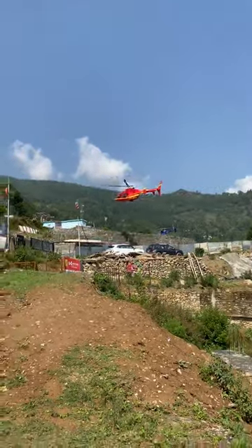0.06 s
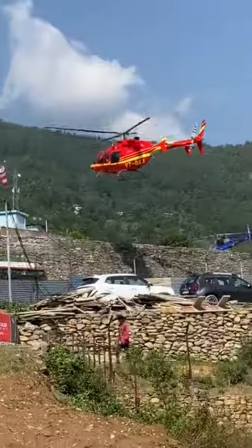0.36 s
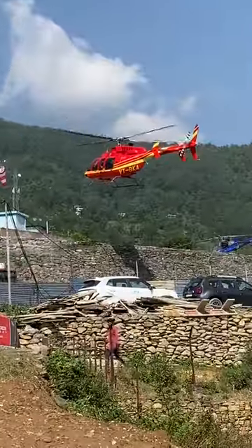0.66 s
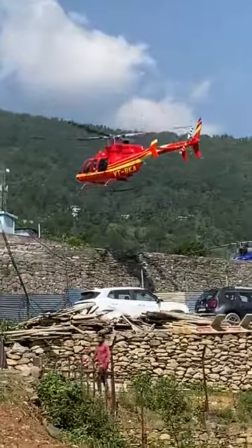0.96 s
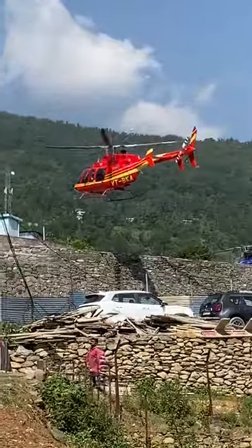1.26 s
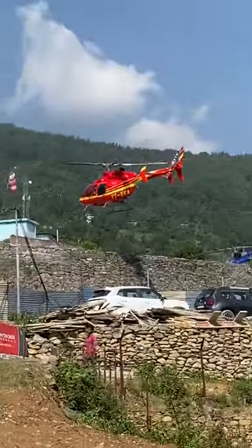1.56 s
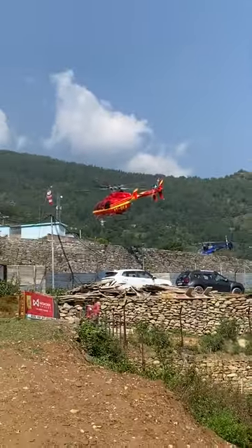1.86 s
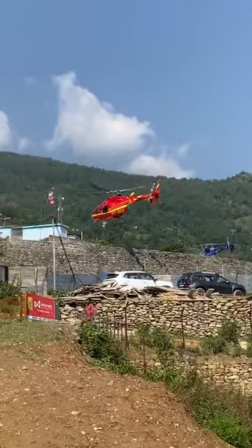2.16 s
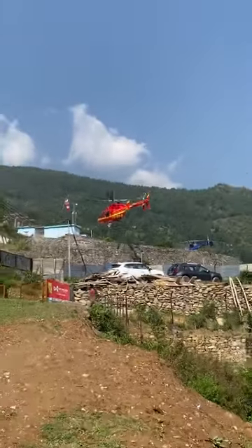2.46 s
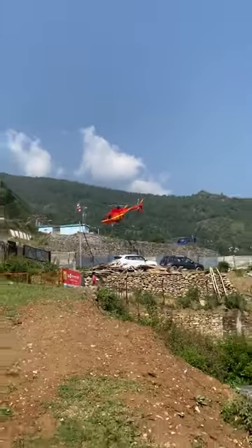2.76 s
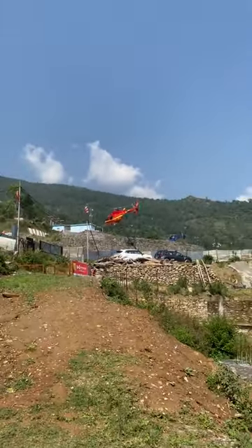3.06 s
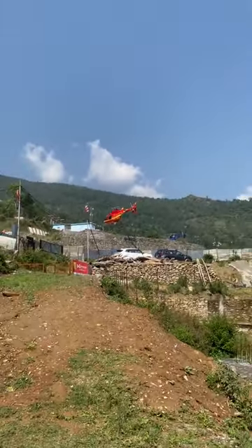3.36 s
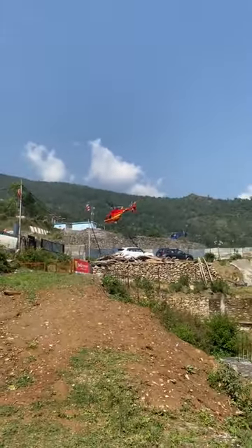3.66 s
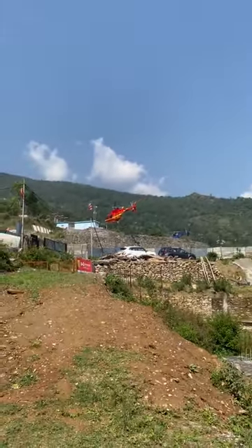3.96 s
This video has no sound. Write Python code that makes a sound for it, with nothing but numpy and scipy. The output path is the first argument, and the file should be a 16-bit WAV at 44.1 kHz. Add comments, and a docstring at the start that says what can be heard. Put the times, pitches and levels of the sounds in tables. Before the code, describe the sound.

A helicopter flies low over an open hillside, its blades thumping and swishing rapidly over a roar, a low drone and faint turbine hiss. The blades slap harder midway, then the sound eases slightly as it moves off.

```python
"""The main rotor of a light helicopter thumps, swishes and slaps, low over a hillside, then moves off.
Each blade radiates a pressure pulse and a burst of turbulent noise, and slaps when it cuts the tip
vortex of the blade ahead. Behind it the tail rotor drones in harmonics, downwash and exhaust roar,
and the turbine gives a very high whine amid hiss. The ground returns dull reflections."""
import sys
import numpy as np
from scipy import signal
from scipy.fft import rfft, irfft, next_fast_len
from scipy.io import wavfile

SR = 44100
rng = np.random.default_rng(int(sys.argv[2]) if len(sys.argv) > 2 else 0)


def transcribe(signal):
    """Save signal, clipped to [-1, 1], as a 16-bit WAV file at the path in sys.argv[1]."""
    frames = np.atleast_2d(signal).T
    limited = np.clip(frames, -1, 1)
    pcm = np.round(limited * 32767).astype(np.int16)
    wavfile.write(sys.argv[1], SR, pcm)


N = 176400
TIME, BIN_HZ = np.arange(N) / SR, np.arange(N // 2 + 1) * SR / N


def from_db(db):
    """Amplitude ratio: tenfold for every 20 dB."""
    return 10 ** (np.asarray(db) / 20)


def unit_rms(x):
    """Normalisation to unit mean power."""
    return x / np.sqrt(np.mean(x ** 2) + 1e-20)


def in_time(rows, column=1):
    """Linear interpolation of one column at every sample."""
    rows = np.array(rows)
    return np.interp(TIME, rows[:, 0], rows[:, column])


def at_hz(rows, hz, column=1):
    """Interpolation of one column on a logarithmic frequency axis."""
    rows = np.array(rows)
    return np.interp(np.log(np.maximum(hz, 1)), np.log(rows[:, 0]), rows[:, column])


def drift(corner_hz):
    """Slow random fluctuation: low-passed Gaussian noise of unit rms."""
    step, settle = 40, 2000
    pole = np.exp(-2 * np.pi * corner_hz * step / SR)
    white = rng.standard_normal(N // step + settle + 2)
    slow = signal.lfilter([1], [1, -2 * pole, pole * pole], white)[settle:]
    return np.interp(np.arange(N) / step, np.arange(len(slow)), unit_rms(slow))


# Limits of the bands that fluctuate independently: (frequency [Hz])
BAND_LIMITS = [0, 320, 560, 900, 1300, 1800, 2600, 3800, 6000, 23000]
def bands(x):
    """Superposition: adjacent frequency bands whose sum is the whole sound."""
    spectrum = rfft(x)
    return [irfft(spectrum * ((BIN_HZ >= low) & (BIN_HZ < high)), N)
            for low, high in zip(BAND_LIMITS, BAND_LIMITS[1:])]


# Two microphones: (frequency [Hz], coherence [ratio], left minus right [dB], left phase lead [rad])
MIC_PAIR = [(102, .999, 0, 0), (292, .99, -1.3, 0.17), (510, 0.77, 3.3, .5), (765, 0.94, 2.5, 0.5),
            (1065, 0.41, 6.5, 0.8), (1260, .95, 7.5, -1.2), (1470, .8, 2, 0.7), (2000, 0.8, 1.3, 0.5),
            (3020, 0.65, 0.5, 0.9), (3620, 0.8, 1, 0.4), (5070, 0.6, .3, 0.9), (6710, .85, 0, 2.2),
            (13350, 0.9, 0, 9), (15900, .8, 0, 12)]
def partly_coherent(pair):
    """Partial coherence: two independent noises mix as mid and side, at unit rms."""
    coherence = np.clip(at_hz(MIC_PAIR, BIN_HZ), 0, .9995)
    mid, side = rfft(pair)
    left_right = np.sqrt(1 + coherence) * mid + np.sqrt(1 - coherence) * side * np.array([[1], [-1]])
    return unit_rms(irfft(left_right, N))


def air_noise(spectrum):
    """Spectral shaping: white noise takes on a given colour, in stereo at unit rms."""
    white = rfft(rng.standard_normal((2, N)))
    return partly_coherent(irfft(white * from_db(at_hz(spectrum, BIN_HZ)), N))


# Turbine: (time [s], relative hiss level [dB], relative whine level [dB], whine frequency [Hz])
TURBINE_COURSE = [(0.0, -43, -43, 14800), (0.58, -44, -45, 14800), (0.91, -43, -41.5, 15000),
                  (1.29, -46.5, -48, 15000), (2.4, -47, -45, 15300), (2.58, -45, -40, 15200),
                  (3.85, -48.5, -52, 15200), (4.0, -47.5, -42, 15200)]
# High hiss with notches near 7 and 13.8 kHz, which the engine does not make:
# (frequency [Hz], relative density [dB])
NOTCHED_HISS_SPECTRUM = [(2000, -15), (3600, 8), (4500, 5), (5500, -1.5), (7000, -15), (8400, 6),
                         (10400, 3.5), (12000, 3), (13800, -26), (16000, -11)]
# A lower band of hiss: (frequency [Hz], relative density [dB])
LOW_HISS_SPECTRUM = [(3000, -33), (3950, -2), (4250, -6), (4600, 3), (5100, -12), (6000, -19)]
# The lower band comes forward as the helicopter turns away: (time [s], level [dB])
LOW_HISS_LEVEL = [(0, -62), (3.2, -48.5), (3.5, -52), (3.7, -39.5), (3.9, -50.5)]
def turbine():
    """Spectral broadening: turbulence smears the compressor tone into a narrow band amid high hiss."""
    carrier = np.exp(2j * np.pi * np.cumsum(in_time(TURBINE_COURSE, column=3)) / SR)
    whine = 0
    for half_width_hz, db in ((85, -1), (330, -1.5)):  # core, skirt
        lowpass = signal.butter(2, half_width_hz, fs=SR, output="sos")
        real, imag = signal.sosfilt(lowpass, rng.standard_normal((2, 2, N)))
        whine += from_db(db) * partly_coherent(((real + 1j * imag) * carrier).real)
    hiss = air_noise(NOTCHED_HISS_SPECTRUM) * from_db(2 + in_time(TURBINE_COURSE) + .5 * drift(9.3))
    hiss += air_noise(LOW_HISS_SPECTRUM) * from_db(in_time(LOW_HISS_LEVEL))
    return whine * from_db(in_time(TURBINE_COURSE, column=2) + 2.1 * drift(25)) + hiss


# Rushing air: (time [s], relative midrange level [dB], relative treble level [dB])
AIR_LEVELS = [(0, -22, -24), (.23, -26.5, -24.5), (.5, -25.5, -24.5), (.8, -23.5, -25.5), (.96, -29, -23.5),
              (1.07, -25.5, -26.5), (1.3, -29.5, -30), (1.52, -27.5, -29.5), (1.66, -23, -29),
              (1.8, -24.5, -32.5), (2.12, -25, -28), (2.45, -24, -28.5), (2.65, -21.5, -26.5),
              (2.85, -24, -29), (3.1, -24.5, -33), (3.35, -27.5, -33), (3.74, -28.5, -31), (4, -24.5, -33)]
# Spectra of the low and high roar: (frequency [Hz], relative density [dB])
LOW_ROAR_SPECTRUM = [(30, -20), (70, -11.5), (120, -9.5), (200, -1.5), (290, -5.5), (480, -6), (700, -4),
                     (1000, -12.5), (1600, -29.5), (3000, -45.5)]
HIGH_ROAR_SPECTRUM = [(400, -58), (850, -2.5), (1400, -1), (2100, -7), (3200, -10.5), (4500, -19),
                      (6300, -18), (9000, -61)]
def roar():
    """Broadband flow noise of downwash and exhaust; each band fades on its own in the moving air."""
    low = air_noise(LOW_ROAR_SPECTRUM) * from_db(in_time(AIR_LEVELS) - 1)
    high = air_noise(HIGH_ROAR_SPECTRUM) * from_db(in_time(AIR_LEVELS, column=2) - 2.5 + 1.63 * drift(64))
    return sum(band * from_db(1.5 * drift(5.7)) for band in bands(low + high))


def partial(cycles, fade_db, blur_rad):
    """Amplitude and phase modulation of a rotor harmonic by moving air, at unit rms."""
    fading = from_db(fade_db * drift(3.6))
    return unit_rms(fading * np.sin(2 * np.pi * (cycles + rng.random()) + blur_rad * drift(1.7)))


TAIL_HZ, TAIL_WANDER = 83.08, 0.00208  # blade-passage frequency, its relative spread
# The tail rotor's first three harmonics: (time [s], level [dB])
TAIL_LEVEL_1 = [(0.0, -41.5), (0.47, -22), (0.96, -34.5), (1.55, -27), (1.83, -32.5), (2.03, -54),
                (2.19, -30), (2.95, -25), (3.45, -43.5), (4.0, -35)]
TAIL_LEVEL_2 = [(0, -32), (.7, -37.5), (1.0, -33.5), (1.2, -29.5), (1.7, -33.5), (2.05, -26), (2.3, -33.5),
                (3.1, -28), (3.75, -30.5), (4, -25.5)]
TAIL_LEVEL_3 = [(0, -35), (.35, -29), (.5, -25), (.7, -24), (.85, -36.5), (1.3, -36), (1.45, -25.5),
                (1.7, -44.5), (2.1, -23), (2.25, -34.5), (2.5, -24.5), (3.15, -26), (3.4, -31), (4, -26.5)]
# Its weaker overtones: (harmonic number, level [dB])
TAIL_OVERTONES = [(4, -42.5), (7, -40.5), (8, -43.5), (9, -45), (10, -48)]
def tail_rotor():
    """Harmonic series: the small, fast rotor drones at multiples of its blade-passage frequency."""
    cycles = np.cumsum(TAIL_HZ * (1 + TAIL_WANDER * drift(1.54))) / SR
    low = sum(from_db(in_time(level)) * partial(k * cycles, fade_db=0.62, blur_rad=0.091)
              for k, level in enumerate((TAIL_LEVEL_1, TAIL_LEVEL_2, TAIL_LEVEL_3), start=1))
    upper = sum(from_db(db) * partial(k * cycles, fade_db=3.5, blur_rad=1.0) for k, db in TAIL_OVERTONES)
    return low + upper


def dulled(x, cutoff_hz=1950):
    """Reflection loss: the ground returns less treble than bass."""
    return signal.sosfilt(signal.butter(1, cutoff_hz, fs=SR, output="sos"), x)


# Paths by way of ground and terraces: (delay [s], left gain [dB], right gain [dB])
ECHO_PATHS = [(.0085, -17, -15.5), (.049, -19.5, -16.5), (.094, -5, -28)]
def hillside_echoes(x):
    """Discrete reflections: each longer path delivers a late, dull copy."""
    dull = dulled(x)
    return sum(from_db([[left], [right]]) * np.pad(dull, ((0, 0), (int(delay * SR), 0)))[:, :N]
               for delay, left, right in ECHO_PATHS)


# Ground reflection as the helicopter recedes: (time [s], reflected amplitude [ratio])
GROUND_REFLECTION = [(2.65, 0.03), (3.5, 0.19), (4, 0.12)]
def ground_effect(x, delay_ms=1.886):
    """Interference: at grazing incidence the reflection is inverted and hollows out the direct sound."""
    share = in_time(GROUND_REFLECTION)
    reflected = np.array([np.interp(TIME - delay_ms / 1000, TIME, side) for side in dulled(x)])
    return (x - share * reflected) / np.sqrt(1 + share ** 2)


BLADE_HZ = 27.3  # blade-passage frequency of the main rotor
# Line spectrum of the thump: (harmonic number, relative level [dB])
THUMP_HARMONICS = [(1, -30), (2, -2.5), (4, -6), (5, -6), (6, -2), (7, 4.5), (8, 0), (9, -4.5), (10, 2),
                   (11, -1.5), (12, -12), (14, -9.5), (15, -6)]
# Envelopes of harmonics 1-2 and of those above: (time [s], relative level [dB])
THUMP_DEEP_LEVEL = [(0.0, -33), (0.57, -35), (2.35, -26), (3.05, -36), (4.0, -32.5)]
THUMP_UPPER_LEVEL = [(0, -40.5), (.9, -37.5), (1.3, -32), (1.7, -41), (2.3, -34), (2.8, -36), (3.1, -34.5),
                     (3.4, -41), (4, -39)]
def rotor_thump():
    """Fourier synthesis: the periodic pressure pulses of the main blades, heard as low harmonics."""
    deep, upper = from_db(in_time(THUMP_DEEP_LEVEL)), from_db(in_time(THUMP_UPPER_LEVEL))
    out = np.zeros(N)
    for k, db in THUMP_HARMONICS:
        cycles = k * BLADE_HZ * TIME
        if k <= 2:
            out += from_db(db) * deep * partial(cycles, fade_db=1.0, blur_rad=0.064)
        else:
            out += from_db(db) * upper * partial(cycles, fade_db=3.5, blur_rad=0.38)
    return out


# Lateness of the loud part of each sweep as the rotor tilts: (time [s], lag [ms])
BLADE_LAG = [(0, 1), (.42, 4.5), (.7, 3), (1.0, 3.5), (1.12, -0.5), (1.48, -2.5), (1.65, 2), (1.83, 4.5),
             (1.97, -0.5), (2.2, 1.5), (2.5, 4.5), (2.75, 4), (3.05, 6), (3.5, 4.5), (3.65, -4), (4, -5)]
def blade_times():
    """Blade passage: the nearly periodic instants at which a blade sweeps toward the listener."""
    regular = np.arange(int(N / SR * BLADE_HZ) + 1) / BLADE_HZ
    return regular + np.interp(regular, TIME, in_time(BLADE_LAG)) / 1000


def sweeps(noise, rise_ms, fall_ms, delay_ms=0, scatter_ms=1.95, colour_db=1.5):
    """Amplitude modulation: noise swells with each blade, each band with its own strength and lag."""
    times, out = blade_times(), 0
    blade_db = 0.2 * rng.standard_normal(len(times))
    for band in bands(noise):
        envelope = np.zeros(N)
        deviations = np.clip(rng.standard_normal((len(times), 2)), -2, 2)
        for at, db, (colour, late) in zip(times, blade_db, deviations):
            near = slice(max(int((at - .5 / BLADE_HZ) * SR), 0), int((at + 1 / BLADE_HZ) * SR))
            ms = (TIME[near] - at) * 1000 - delay_ms - scatter_ms * late
            rise, fall = np.exp(-(ms / rise_ms) ** 2), np.exp(-np.abs(ms / fall_ms) ** 1.3)
            envelope[near] += from_db(db + colour_db * colour) * np.where(ms < 0, rise, fall)
        out += band * envelope
    return unit_rms(out)


# Spectra of the bright swish and the dark whuff: (frequency [Hz], relative density [dB])
SWISH_SPECTRUM = [(400, -22), (800, 0.5), (1400, 1), (2100, -4.5), (2800, -7), (4600, -14.5), (6500, -26.5),
                  (12000, -45)]
WHUFF_SPECTRUM = [(120, -25), (220, -4), (350, -1), (500, -4.5), (720, 2), (1000, -6.5), (1500, -10),
                  (3000, -35)]
# Their prominence over the rushing air: (time [s], relative level [dB])
SWISH_LEVEL = [(0, 1), (.28, 2), (.5, -2.5), (.75, -3.5), (.92, 0.5), (1.08, -4.5), (1.33, -0.5),
               (1.48, 8.5), (1.67, 1.5), (2.15, -0.5), (2.38, -5), (2.65, -3), (2.95, -2.5), (3.25, -6),
               (4, -7.5)]
WHUFF_LEVEL = [(0, -3.5), (.3, 5.5), (.55, -3.5), (.95, -1), (1.15, 3.5), (1.35, 6), (1.5, 3.5), (1.7, 3.5),
               (1.9, 3.5), (2.15, 4.5), (2.38, -5.5), (2.7, 0.5), (3.2, 1.5), (3.6, -7.5), (4, -3.5)]
def blade_swish():
    """Turbulent noise: air torn by each blade gives a bright swish, then a darker whuff."""
    swish = sweeps(air_noise(SWISH_SPECTRUM), rise_ms=2.94, fall_ms=5.3)
    whuff = sweeps(air_noise(WHUFF_SPECTRUM), rise_ms=3.7, fall_ms=6.8, delay_ms=1.35)
    return (swish * from_db(in_time(SWISH_LEVEL) + in_time(AIR_LEVELS, column=2) - 2)
            + whuff * from_db(in_time(WHUFF_LEVEL) + in_time(AIR_LEVELS) - 4.5))


# Glancing vortex cuts: (time [s], envelope peak [dB], frequency [Hz])
GLANCING_CUTS = [(.15, -16, 2500), (0.958, -13, 1410), (1.464, -13.5, 1860), (2.827, -13.5, 1380),
                 (2.862, -18.5, 1840), (2.899, -14.5, 1690), (2.937, -11, 1500), (3.01, -13.5, 1400),
                 (3.047, -16, 1790), (3.375, -22, 1950)]
def blade_knocks(width_ms=1.8):
    """Tone bursts: a glancing vortex cut radiates a few cycles around one pitch."""
    out = np.zeros(N)
    for at, db, hz in GLANCING_CUTS:
        since = TIME - at
        envelope = from_db(db) * np.exp(-(since * 1000 / width_ms) ** 2)
        out += envelope * np.sin(2 * np.pi * (hz * since + rng.random()))
    return out


# Square hits on the vortex: (time [s], peak level [dB])
SQUARE_CUTS = [(1.838, -11), (2.052, -9.5), (2.6063, -3), (2.6407, -7), (2.7151, -7), (2.7506, -6.5),
               (2.788, -10.5), (2.8264, -7)]
def blade_cracks():
    """Impulsive radiation: each square vortex cut makes one pressure jump, blunter when weaker."""
    out = np.zeros(N)
    for at, db in SQUARE_CUTS:
        width_ms = 0.069 / np.sqrt(from_db(db))
        edge = (TIME - at) * 1000 / width_ms
        out += from_db(db) * edge * np.exp(.5 - .5 * edge ** 2)
    return out


# Strength of the slap: (time [s], relative level [dB])
SLAP_STRENGTH = [(0, -27), (.78, -29), (1.0, -15), (1.14, -12), (1.33, -10.5), (1.47, -17), (1.58, -16),
                 (1.68, -7), (1.78, -19), (1.92, -19.5), (2.11, -9.5), (2.3, -23), (2.53, -19), (2.62, -11),
                 (2.68, -12), (2.82, -10.5), (2.87, -20), (3.05, -14.5), (3.4, -22), (4, -19.5)]
# Rings of one slap: (frequency [Hz], relative level [dB], decay [ms], delay [ms], growth [dB/dB])
SLAP_OSCILLATIONS = [(321.5, -4, 4.8, 3.98, 0.82), (396.6, 1.5, 3.8, 2.796, 1), (710, -7.5, 1.6, 1.23, 1.1),
                     (1380, -6, 1.5, 0.84, 1.3)]
def blade_slap(slap_spread_db=1.2, ring_spread_db=2.9, jitter_ms=0.13, detune=0.031, rise_cycles=0.63):
    """Blade-vortex interaction: a brief high ring, then lower, longer ones; harder slaps are brighter."""
    out, strength = np.zeros(N), in_time(SLAP_STRENGTH)
    for at in blade_times():
        near = slice(max(int((at - 1 / BLADE_HZ) * SR), 0), int((at + 1 / BLADE_HZ) * SR))
        slap_db = np.interp(at, TIME, strength) + slap_spread_db * rng.standard_normal()
        since_ms = (TIME[near] - at) * 1000 + jitter_ms * rng.standard_normal()
        for hz, db, decay_ms, delay_ms, growth in SLAP_OSCILLATIONS:
            ms = since_ms - delay_ms
            cycles = ms / 1000 * hz * np.exp(detune * rng.standard_normal())
            rise, fall = np.exp(-(cycles / rise_cycles) ** 2), np.exp(-np.abs(ms / decay_ms))
            gain = from_db(db + growth * slap_db + ring_spread_db * rng.standard_normal())
            out[near] += gain * np.where(ms < 0, rise, fall) * np.sin(2 * np.pi * cycles)
    return out


def scene():
    """Superposition: blade noise, its echoes and the roar meet the ground; tones and turbine add on."""
    blades = blade_swish() + blade_slap() + blade_cracks() + blade_knocks()
    broadband = ground_effect(blades + hillside_echoes(blades) + roar())
    return broadband + rotor_thump() + tail_rotor() + turbine()


def record(dry, ceiling=.9, cutoff_hz=15900):
    """Stereo pickup: level and phase differences, soft saturation of the peaks, then a steep low-pass."""
    size = next_fast_len(N + SR // 10)
    hz = np.arange(size // 2 + 1) * SR / size
    balance = from_db(np.array([[.5], [-.5]]) * at_hz(MIC_PAIR, hz, column=2))
    phase = np.exp(1j * np.array([[0], [-1]]) * at_hz(MIC_PAIR, hz, column=3))
    heard = irfft(rfft(dry, size) * balance * phase, size)[:, :N]
    rounded = heard / (1 + (heard / ceiling) ** 6) ** (1 / 6)
    return signal.sosfilt(signal.ellip(12, .2, 80, cutoff_hz, fs=SR, output="sos"), rounded)


dry = scene()
out = record(dry)
transcribe(out)
```